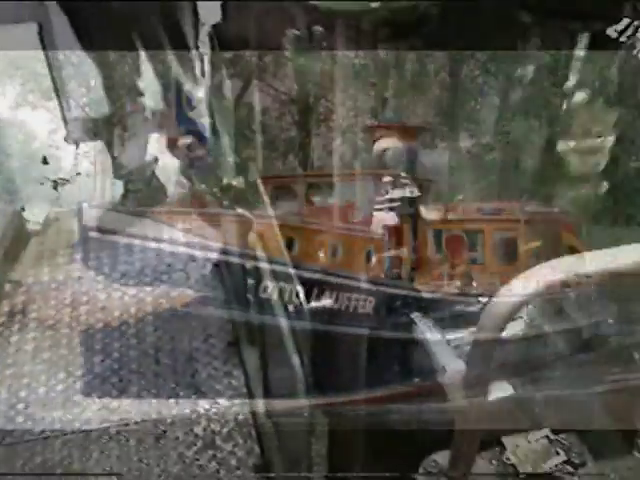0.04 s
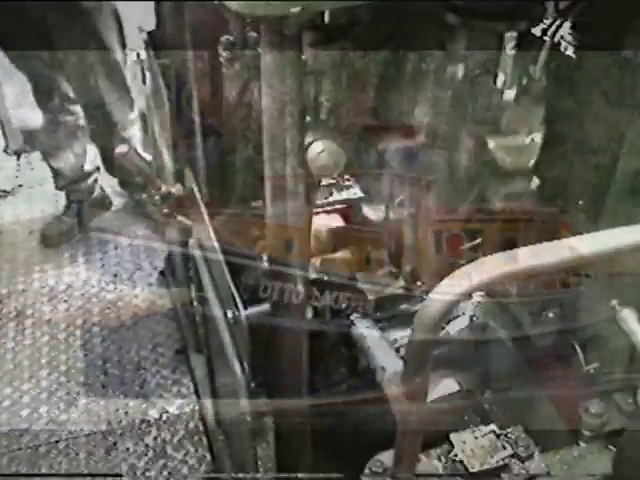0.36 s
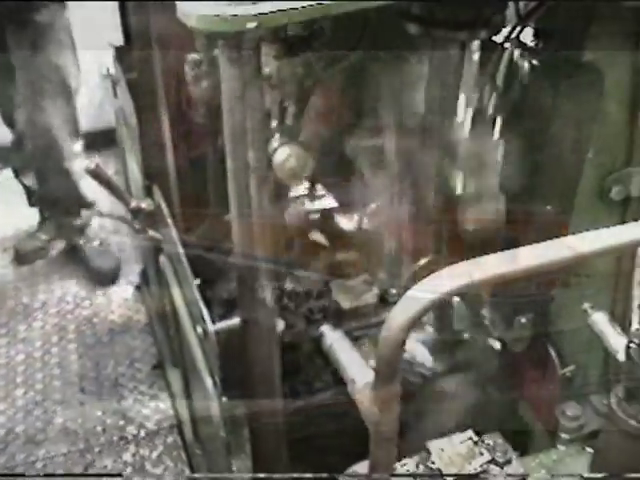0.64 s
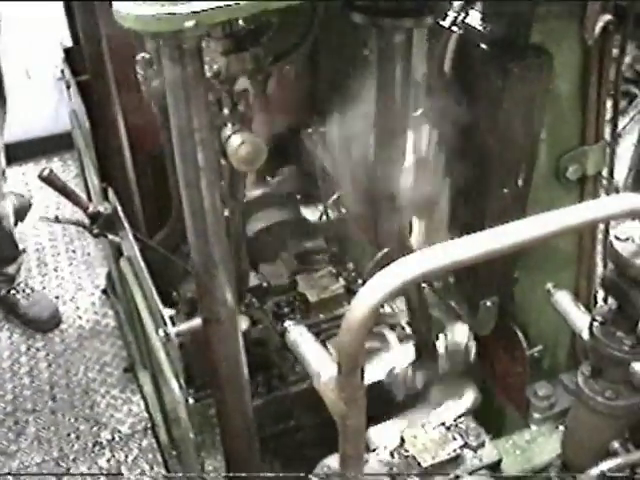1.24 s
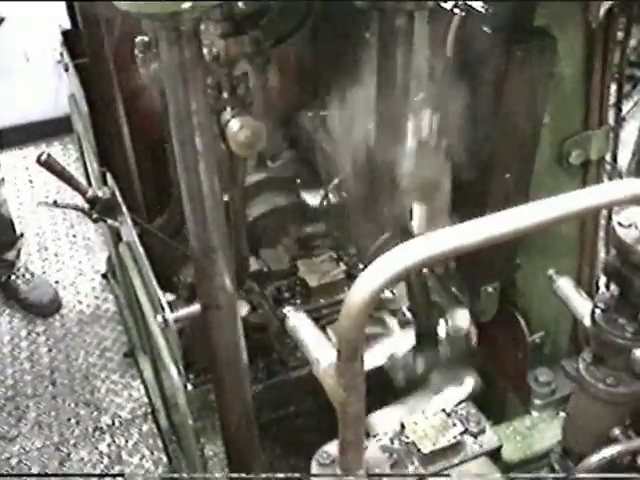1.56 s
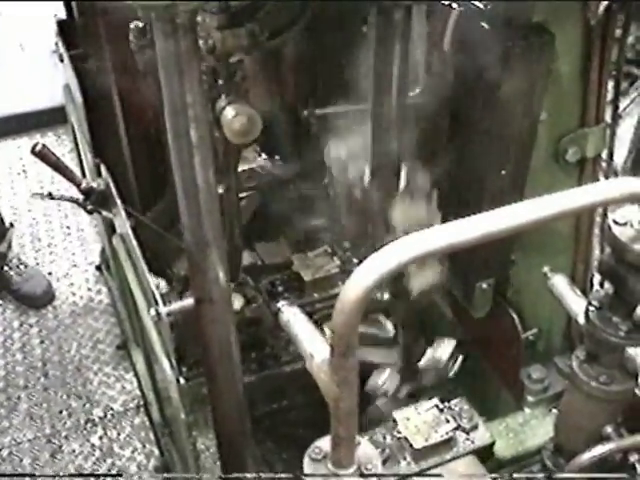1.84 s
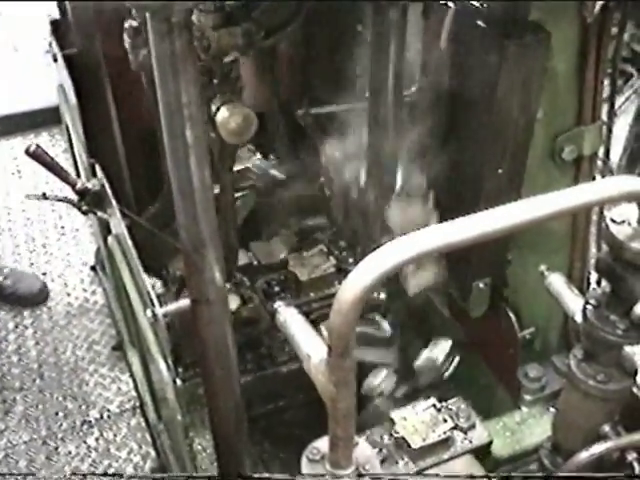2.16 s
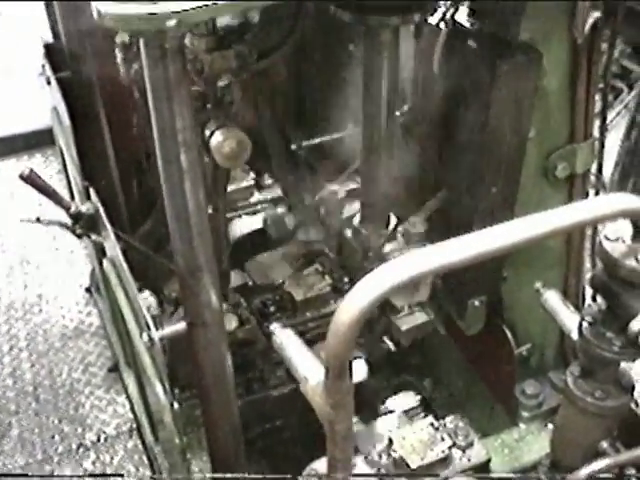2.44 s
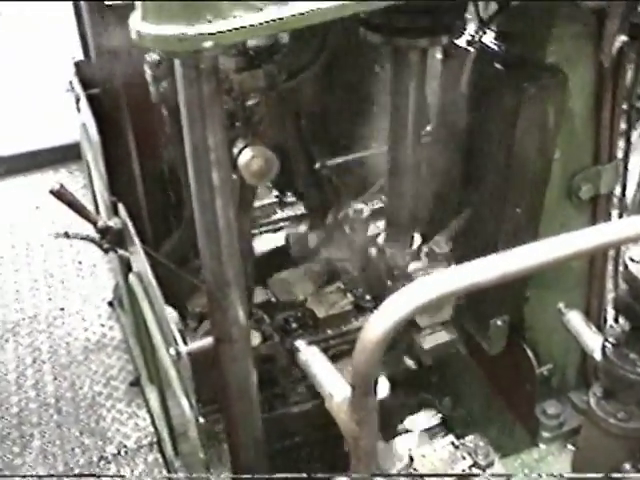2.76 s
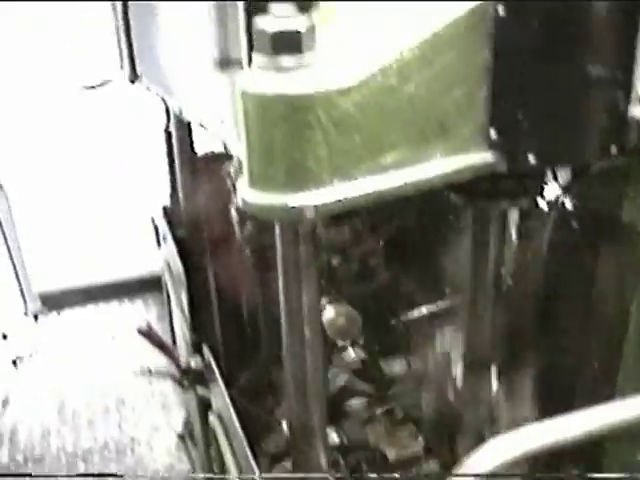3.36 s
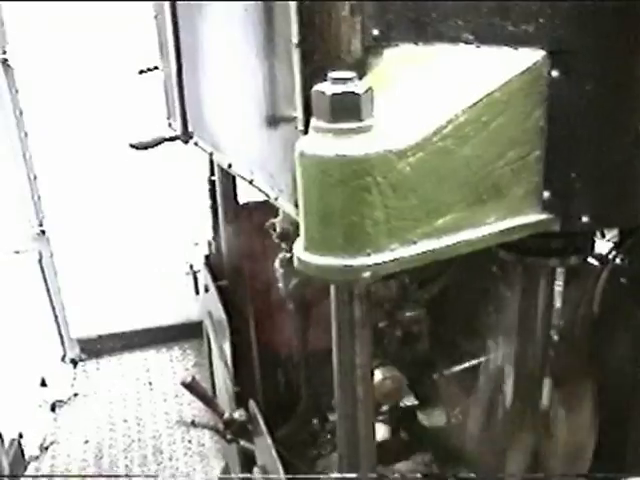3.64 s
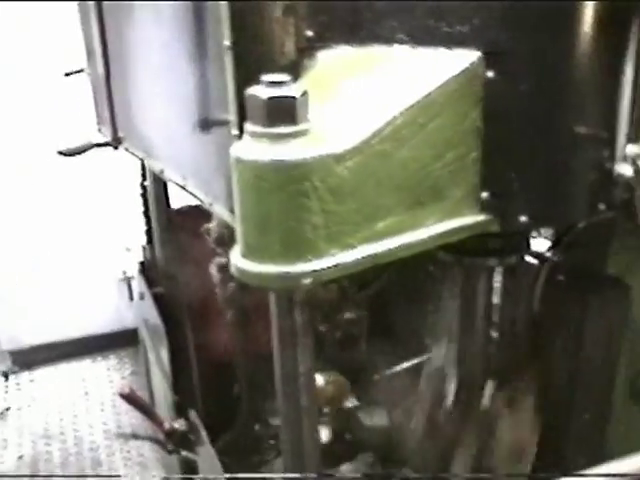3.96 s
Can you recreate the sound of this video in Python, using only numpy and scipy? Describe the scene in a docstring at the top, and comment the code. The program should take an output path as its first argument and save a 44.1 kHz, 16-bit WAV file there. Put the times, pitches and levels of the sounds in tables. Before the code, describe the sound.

Close reciprocating steam engine running fast, with chuffs, metal knocks and constant hiss.

```python
"""In a ship's engine room, a reciprocating steam engine, heard close up, fades in at three turns a second.
Steam hisses throughout, the hull throbs and rumbles, and the moving masses thump the bedplate.
The motion is periodic, so every turn plays the same round: valve tick, chuff, a ring of steel,
a bearing knock, a second tick and chuff, two short squeaks. Steam gives broadband noise;
struck or rubbed steel sounds at its resonances."""
import sys
import numpy as np
from scipy.fft import rfft, irfft
from scipy.io import wavfile

SR = 44100
rng = np.random.default_rng(int(sys.argv[2]) if len(sys.argv) > 2 else 0)


def waveform_to_disk(signal):
    """Save audio, clipped to [-1, 1], as 16-bit WAV at the path in sys.argv[1]."""
    frames = np.transpose(np.atleast_2d(signal))
    scaled = np.clip(frames, -1, 1) * 32767
    samples = np.round(scaled).astype(np.int16)
    wavfile.write(sys.argv[1], SR, samples)


N = 176400

# crank turns: (time of the first valve tick [s], relative level of that tick [dB])
TURNS = [(-.159, 0), (.1633, 1.5), (.4863, 1), (.8092, 1.5), (1.1223, 1), (1.4429, 0), (1.7613, -1),
         (2.0828, 0), (2.4044, 2), (2.7249, 0), (3.048, -4), (3.3671, -2), (3.684, -1.5), (4.003, -2)]
# spectra of the steam leak and the hull's rumble: (frequency [Hz], relative level [dB])
LEAK_SPECTRUM = [(300, -1), (600, -2), (1100, .5), (1400, -1), (1800, 3), (3000, -1), (5000, -1.5),
                 (6300, -8), (8000, -20), (9300, -30), (12500, -33)]
RUMBLE_SPECTRUM = [(20, -14), (40, -11), (70, -9), (88, -2), (180, 2), (260, 0), (290, -6), (335, -5),
                   (360, -9), (420, -9.5), (500, -18), (600, -21), (1000, -36), (4000, -80)]
# harmonics of the hull's throb: (order [cycles a turn], rms level [dB])
THROB_HARMONICS = [(4, -64), (8, -53), (12, -66), (16, -61), (20, -61), (28, -54), (40, -53), (45, -52)]
# thumps of the moving masses on the bedplate: (delay in the turn [s], frequency [Hz], level [dB])
THUMPS = [(-.006, 165, -35.5), (.026, 118, -36.5), (.035, 262, -36), (.054, 165, -37.5), (.089, 160, -39),
          (.123, 190, -35), (.131, 305, -41), (.14, 140, -36), (.177, 145, -36), (.202, 180, -35.5),
          (.219, 235, -35.5), (.237, 215, -36), (.256, 165, -39), (.284, 180, -37.5)]
# spectra of the valve ticks and chuffs: (frequency [Hz], relative level [dB])
TICK_SPECTRUM = [(500, -20), (2000, -6), (5300, 1), (6200, -1), (7000, -9), (7800, -1), (8400, -9),
                 (9200, -19), (12500, -24)]
DOWN_CHUFF_SPECTRUM = [(200, -10), (430, 4), (720, -4), (1100, 3), (1400, -5), (2250, 4), (3200, -2),
                       (5400, 0), (6500, -10), (8000, -20), (9500, -33), (12500, -36)]
RETURN_TICK_SPECTRUM = [(300, -5), (480, 1), (720, -6), (950, 3), (1300, -1), (2150, 4), (2700, -4),
                        (4000, -5), (5600, -2), (6700, -12), (7700, -14), (9500, -28), (12500, -30)]
UP_CHUFF_SPECTRUM = [(250, -5), (430, 6), (700, -6), (1150, -3), (1800, 1), (2400, 2), (2900, -3),
                     (3900, 1), (5400, 0), (6500, -11), (8000, -21), (9500, -32), (12500, -35)]
# rings and squeaks of the rods and slides:
# (delay [s], attack [s], hold [s], t60 [s], level [dB], frequency [Hz], bandwidth [Hz])
SQUEAKS = [(0, .002, .018, .12, -57, 3080, 70), (.068, .004, .014, .12, -49, 4440, 220),
           (.068, .004, .014, .14, -45.5, 4990, 380), (.05, .025, .015, .15, -52.5, 3850, 110),
           (.203, .012, .005, .16, -45.5, 3850, 280), (.213, .008, .008, .15, -50, 4990, 150),
           (.262, .008, .005, .09, -44.5, 1850, 70), (.262, .01, .006, .1, -54.5, 3860, 160),
           (.27, .008, .004, .08, -54, 5000, 180)]
# spectra of the bearing's knock and its hiss: (frequency [Hz], relative level [dB])
KNOCK_SPECTRUM = [(250, -15), (450, -4), (700, -4), (1100, -3), (1320, -8), (1600, -1), (2850, -1),
                  (3400, -13), (6000, -25), (10000, -50)]
KNOCK_HISS_SPECTRUM = [(1500, -8), (3000, 0), (5600, 0), (7000, -5), (8300, -15), (9500, -24), (12500, -26)]
# modes of the bearing: (frequency [Hz], bandwidth [Hz], relative level [dB])
BEARING_MODES = [(850, 45, -2), (1000, 45, -2), (1160, 50, -4), (1590, 40, 5), (1790, 70, -4),
                 (2000, 70, -4), (2260, 90, -5), (2720, 200, -5)]
# fade-in: (time [s], level [dB])
FADE = [(0, -6.5), (.3, -5), (.65, -3.6), (1.25, -1.2), (1.85, .2), (2.6, .4), (4, .6)]
# microphone response: (frequency [Hz], gain [dB])
MICROPHONE = [(10, 0), (7000, 0), (8300, -1.5), (9500, -5), (11500, -7), (12900, -11)]

# bursts within a turn: (delay [s], attack [s], hold [s], t60 [s], level [dB])
TICK = (0, .0006, .012, .22, -49)
DOWN_CHUFF = (.024, .014, .024, .48, -43.3)
KNOCK = (.095, .009, .009, .17, -39.8)
KNOCK_HISS = (.094, .008, .012, .48, -49)
RETURN_TICK = (.183, .013, .005, .18, -41.5)
UP_CHUFF = (.192, .02, .012, .3, -40)

LEAK_DB, LEAK_SWING_DB, LEAK_PEAK_TURNS = -49.2, .9, .45
RUMBLE_DB, THUMP_DETUNE = -40.6, .025
RING_DB, RING_LAG_S = -2.5, .004  # relative to the knock
SPUTTER_DB, SPUTTER_RATE_HZ = 1.4, 450
SCATTER_DB = .5  # from turn to turn
BAND_LIMIT_HZ = 12900
SPAN = 24000  # samples in one burst


def amp(db):
    """Decibels to amplitude ratio."""
    return 10 ** (np.asarray(db) / 20)


def unit(x):
    """Each row normalised to rms 1."""
    return x / np.sqrt(np.mean(x ** 2, axis=-1, keepdims=True) + 1e-20)


def colour(points):
    """Frequency response through (frequency [Hz], level [dB]) points, rolling off below the first."""
    f, db = np.transpose(points)
    curve = lambda hz: amp(np.interp(np.log(hz + 1), np.log(f), db))
    return lambda hz: curve(hz) * hz ** 2 / (hz ** 2 + (f[0] / 2) ** 2)


def resonance(hz, centre, width):
    """Complex response of a damped oscillator."""
    return 1j * hz * width / (centre ** 2 - hz ** 2 + 1j * hz * width)


def filtered(x, response):
    """Linear filtering: the spectrum of x times a frequency response."""
    n = x.shape[-1]
    return irfft(rfft(x) * response(np.fft.rfftfreq(n, 1 / SR)), n)


def envelope(attack, hold, t60):
    """Linear rise, hold, then exponential decay by 60 dB in t60 seconds."""
    t = np.arange(SPAN) / SR
    return np.minimum(t / attack, 1) * amp(-60 * np.maximum(t - attack - hold, 0) / t60)


def crank():
    """Phase of the crank at each sample, in turns."""
    return np.interp(np.arange(N) / SR, np.transpose(TURNS)[0], np.arange(len(TURNS)))


def turn_noise(response, shared):
    """Partly correlated noise, one row a turn: a shared fraction of the power repeats."""
    white = rng.standard_normal((len(TURNS) + 1, SPAN))
    return unit(filtered(np.sqrt(shared) * white[0] + np.sqrt(1 - shared) * white[1:], response))


def each_turn(rows, delay, scatter_s):
    """Near-periodic repetition: one row in each turn, scattered in time and level."""
    out = np.zeros(N + 3 * SR)
    for (start, _), row, (late, loud) in zip(TURNS, rows, rng.standard_normal((len(TURNS), 2))):
        onset = round((1 + start + delay + late * scatter_s) * SR)
        out[onset:onset + SPAN] += row * amp(loud * SCATTER_DB)
    return out[SR:SR + N]


def burst(shape, response, turn_db=0):
    """A noise burst once a turn; random amplitude modulation makes it sputter."""
    delay, attack, hold, t60, db = shape
    at = np.arange(SPAN) * SPUTTER_RATE_HZ / SR
    knots = rng.standard_normal((len(TURNS), SPAN // 20))
    sputter = np.array([np.interp(at, np.arange(len(row)), row) for row in knots])
    noise = unit(turn_noise(response, shared=.35) * amp(SPUTTER_DB * sputter))
    rows = noise * amp(turn_db) * envelope(attack, hold, t60)
    return amp(db) * each_turn(rows, delay, scatter_s=.0009)


def steam_leak():
    """Turbulence: leaking steam makes broadband noise that swells and eases with the crank."""
    level_db = LEAK_DB + LEAK_SWING_DB * np.cos(2 * np.pi * (crank() - LEAK_PEAK_TURNS))
    return amp(level_db) * unit(filtered(rng.standard_normal(N), colour(LEAK_SPECTRUM)))


def hull():
    """Forced vibration: a throb at harmonics of the crank rate, and a rumble that partly repeats."""
    throb = sum(amp(db) * np.sqrt(2) * np.sin(2 * np.pi * (order * crank() + rng.random()))
                for order, db in THROB_HARMONICS)
    rumble = turn_noise(colour(RUMBLE_SPECTRUM), shared=.5) * envelope(attack=.02, hold=.295, t60=.1)
    return throb + amp(RUMBLE_DB) * each_turn(rumble, delay=0, scatter_s=0)


def bedplate():
    """Inertial forces: reversing pistons, rods and cranks excite low, heavily damped vibrations."""
    out, t = np.zeros(N), np.arange(SPAN) / SR
    shape = envelope(attack=.008, hold=.003, t60=.065)
    for delay, hz, db in THUMPS:
        pitch = hz * (1 + THUMP_DETUNE * rng.standard_normal((len(TURNS), 1)))
        out += amp(db) * each_turn(np.sin(2 * np.pi * pitch * t) * shape, delay, scatter_s=.0004)
    return out


def valves():
    """Interrupted flow: twice a turn a valve ticks and steam escapes in a turbulent chuff."""
    tick = burst(TICK, colour(TICK_SPECTRUM), turn_db=np.array(TURNS)[:, 1:])
    down_chuff = burst(DOWN_CHUFF, colour(DOWN_CHUFF_SPECTRUM))
    return_tick = burst(RETURN_TICK, colour(RETURN_TICK_SPECTRUM))
    up_chuff = burst(UP_CHUFF, colour(UP_CHUFF_SPECTRUM))
    return tick + down_chuff + return_tick + up_chuff


def squeaks():
    """Friction excites narrow resonances of the steel rods and slides at set points of the turn."""
    return sum(burst(shape, lambda hz: resonance(hz, centre, width) ** 2)
               for *shape, centre, width in SQUEAKS)


def bearing():
    """Impact excitation: a bearing takes up its play with a knock, ringing modes and a spit of hiss."""
    steel = lambda hz: sum((-1) ** k * amp(db) * resonance(hz, centre, width)
                           for k, (centre, width, db) in enumerate(BEARING_MODES))
    ring = amp(RING_DB) * burst((KNOCK[0] + RING_LAG_S, *KNOCK[1:]), steel)
    knock = burst(KNOCK, colour(KNOCK_SPECTRUM))
    hiss = burst(KNOCK_HISS, colour(KNOCK_HISS_SPECTRUM))
    return knock + ring + hiss


def scene():
    """Superposition: the engine's sources add in one channel."""
    return (steam_leak() + valves() + bearing() + squeaks() + bedplate() + hull())[None]


def record(dry):
    """Gain and low-pass filtering: the sound fades in; the microphone dulls and cuts off the treble."""
    fade = amp(np.interp(np.arange(N) / SR, *np.transpose(FADE)))
    padded = np.pad(dry * fade, ((0, 0), (0, SR)))
    return filtered(padded, lambda hz: colour(MICROPHONE)(hz) * (hz < BAND_LIMIT_HZ))[:, :N]


dry = scene()
out = record(dry)
waveform_to_disk(out)
```